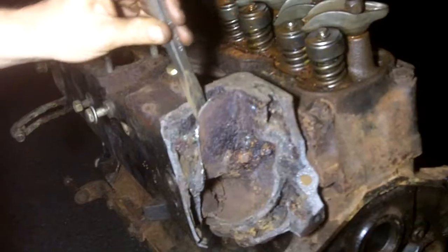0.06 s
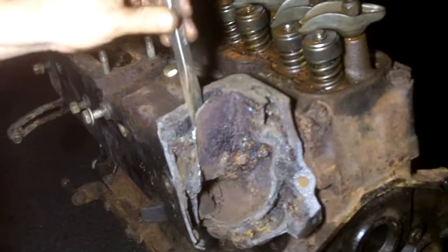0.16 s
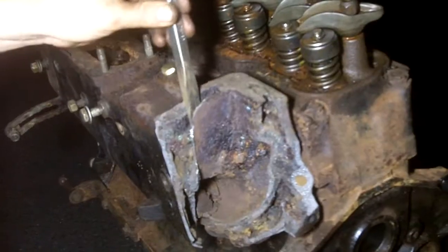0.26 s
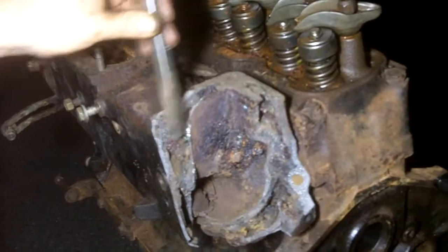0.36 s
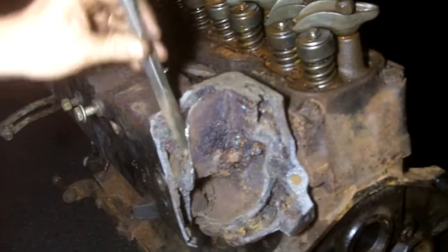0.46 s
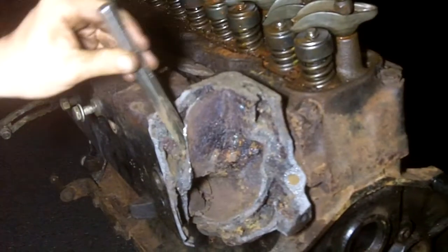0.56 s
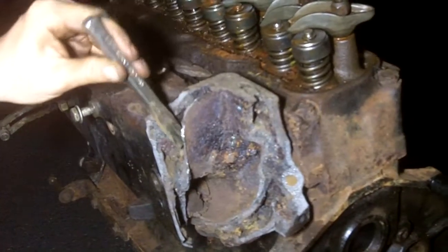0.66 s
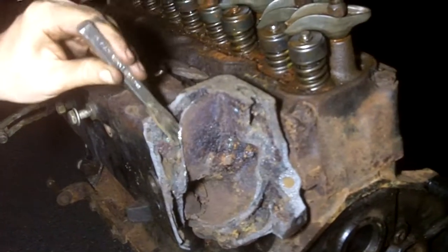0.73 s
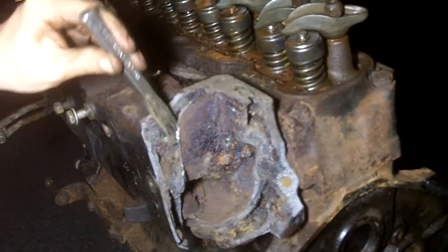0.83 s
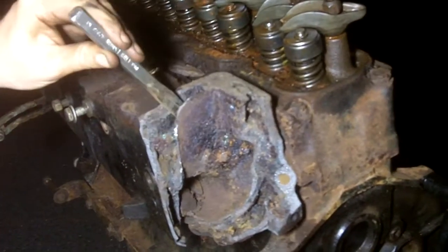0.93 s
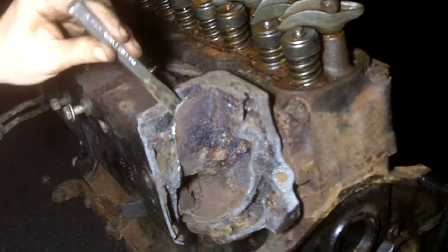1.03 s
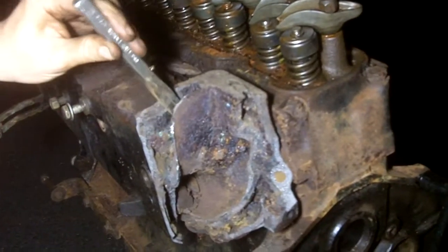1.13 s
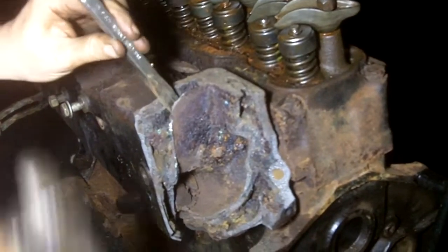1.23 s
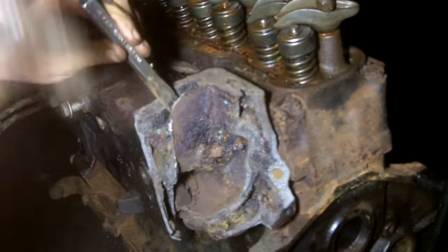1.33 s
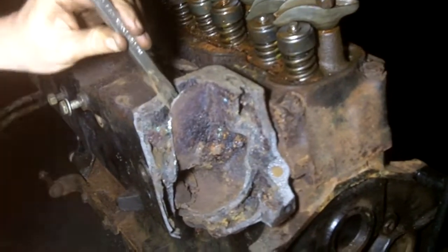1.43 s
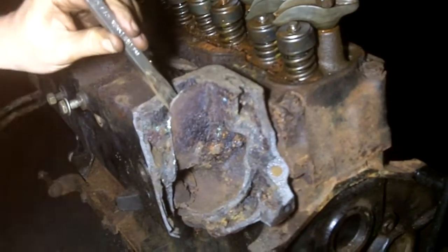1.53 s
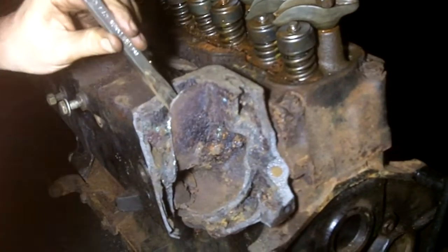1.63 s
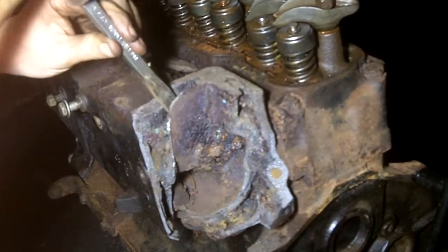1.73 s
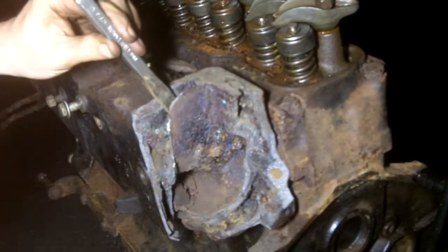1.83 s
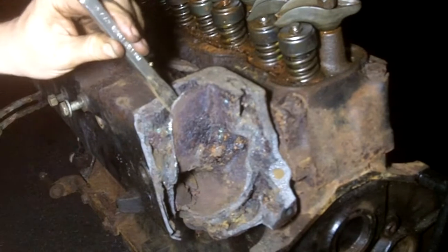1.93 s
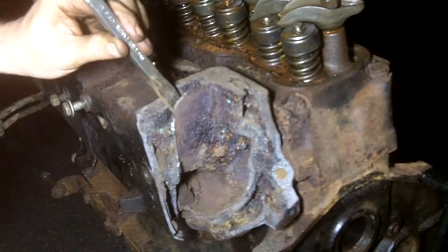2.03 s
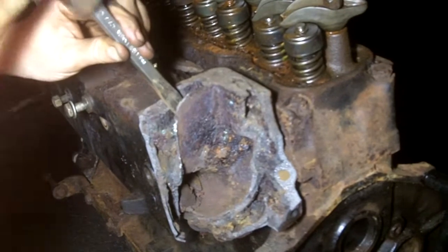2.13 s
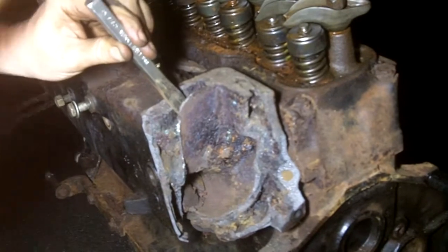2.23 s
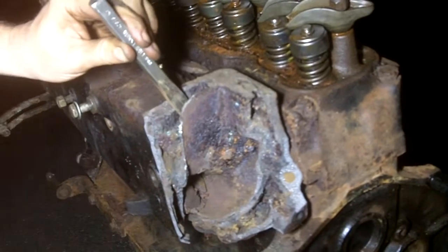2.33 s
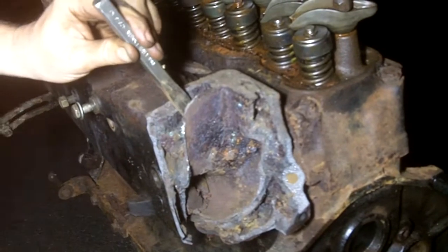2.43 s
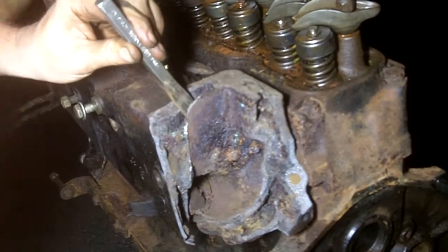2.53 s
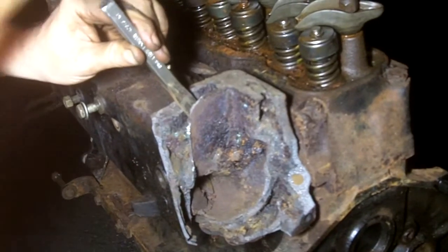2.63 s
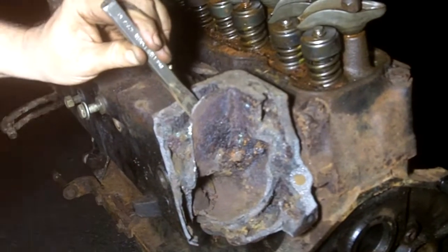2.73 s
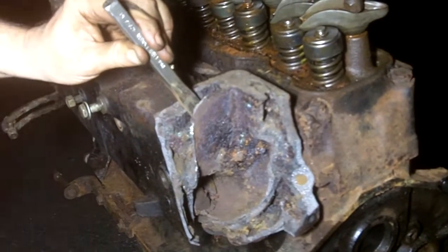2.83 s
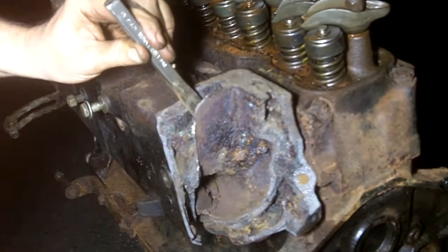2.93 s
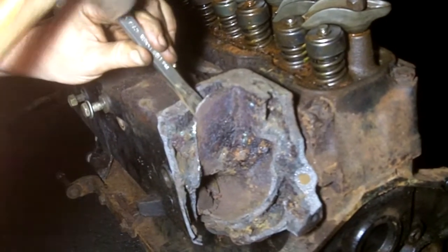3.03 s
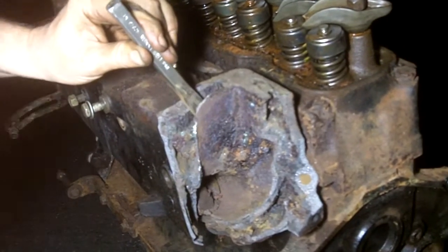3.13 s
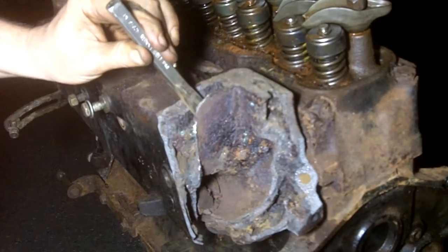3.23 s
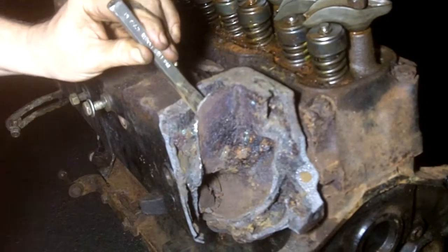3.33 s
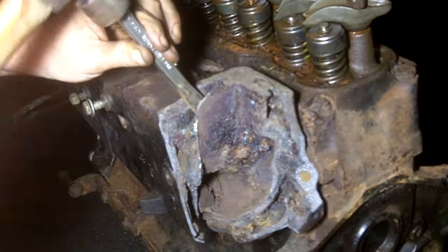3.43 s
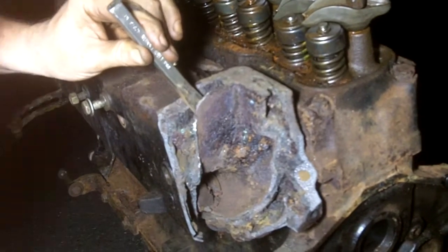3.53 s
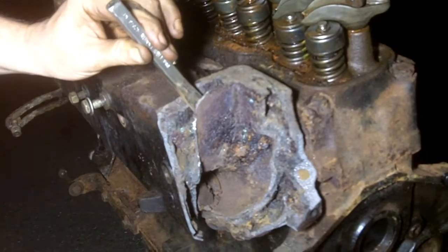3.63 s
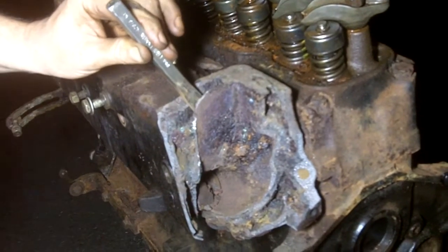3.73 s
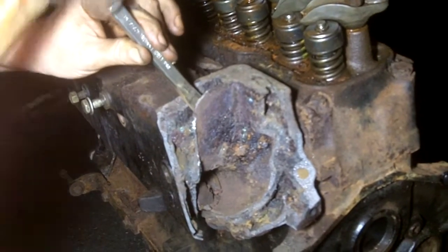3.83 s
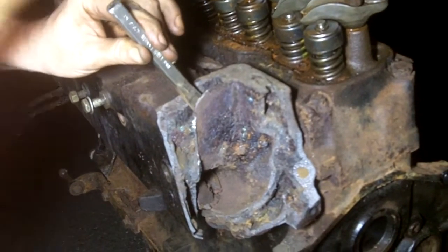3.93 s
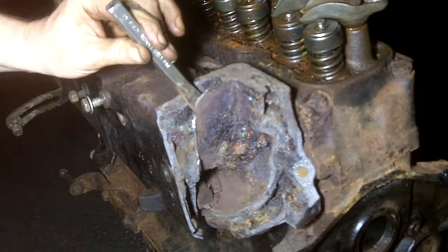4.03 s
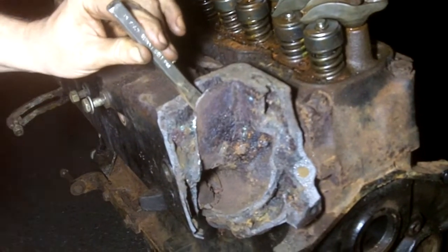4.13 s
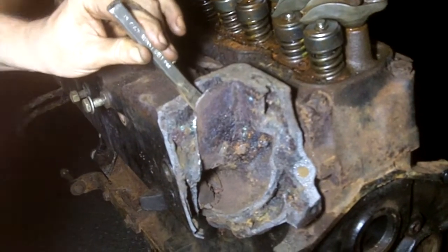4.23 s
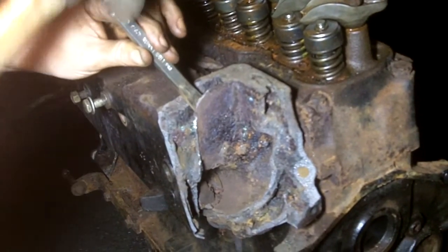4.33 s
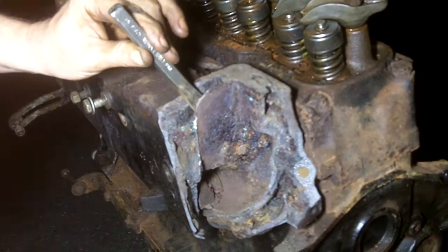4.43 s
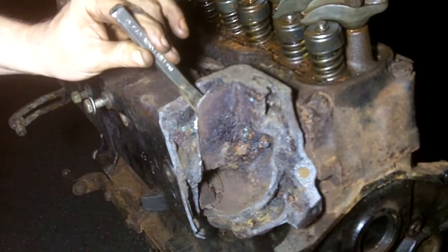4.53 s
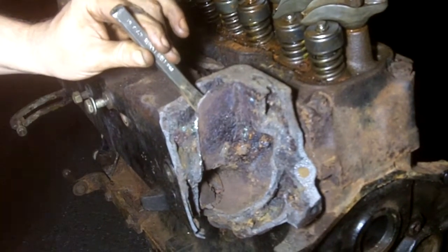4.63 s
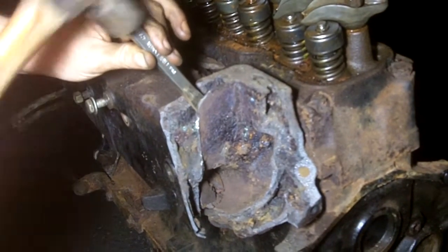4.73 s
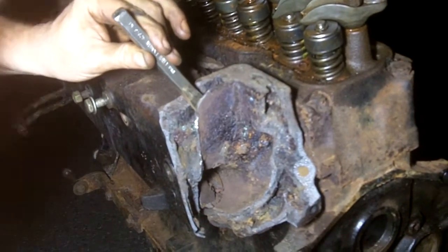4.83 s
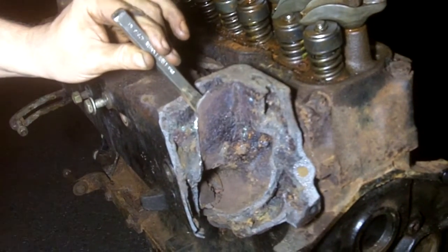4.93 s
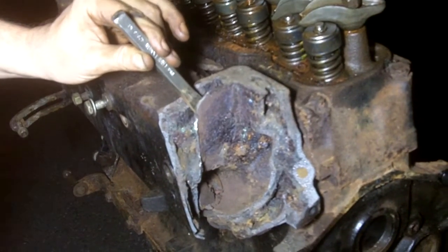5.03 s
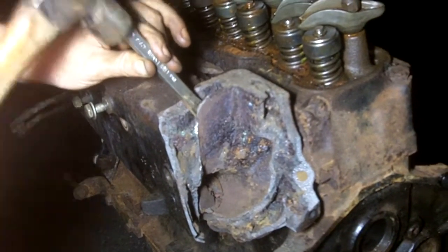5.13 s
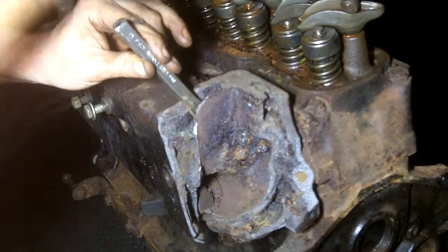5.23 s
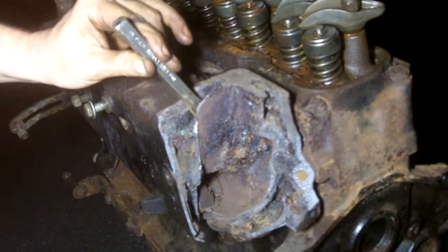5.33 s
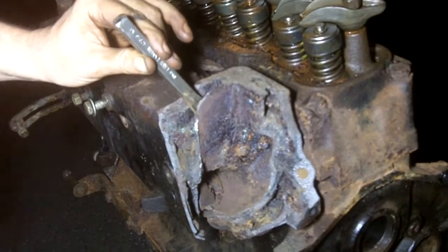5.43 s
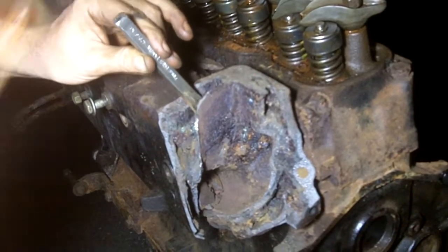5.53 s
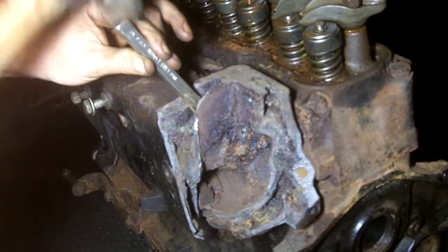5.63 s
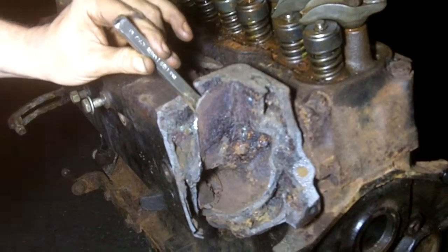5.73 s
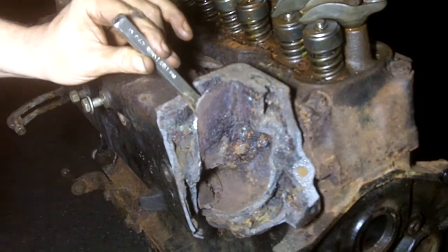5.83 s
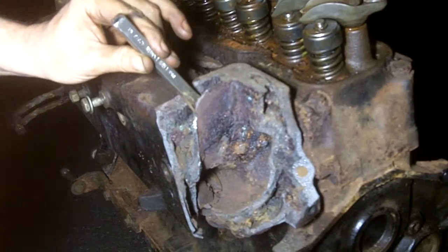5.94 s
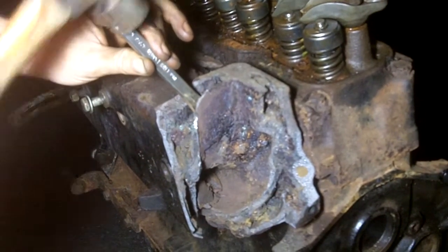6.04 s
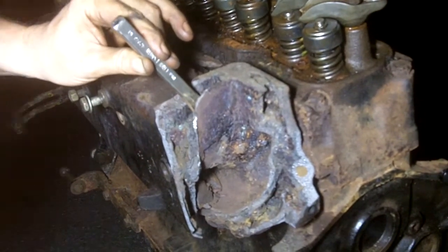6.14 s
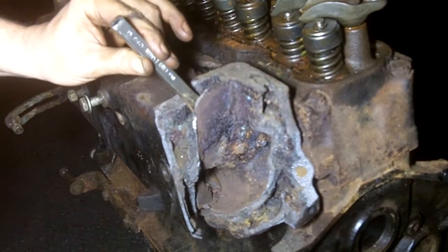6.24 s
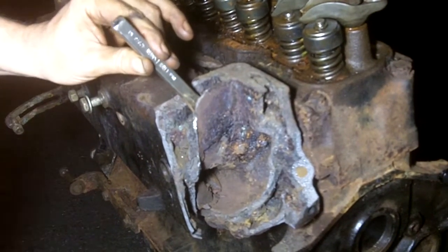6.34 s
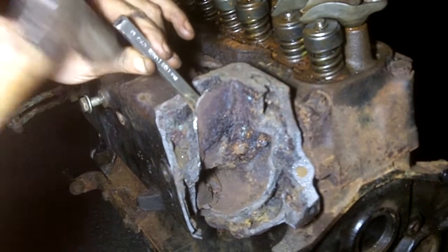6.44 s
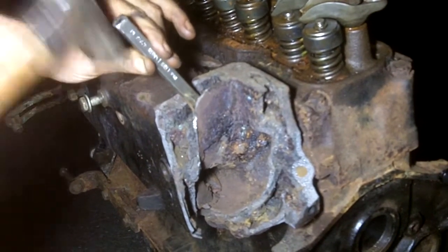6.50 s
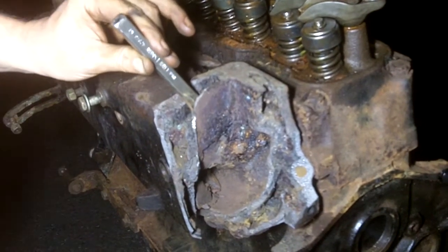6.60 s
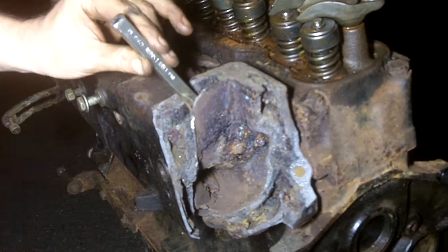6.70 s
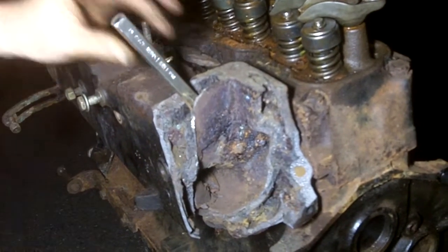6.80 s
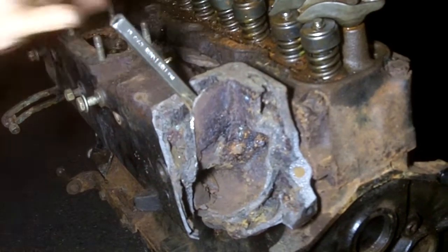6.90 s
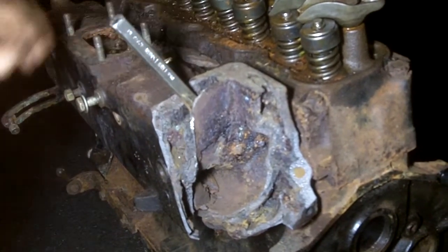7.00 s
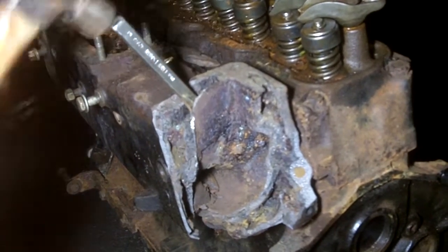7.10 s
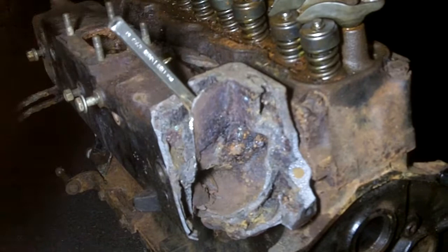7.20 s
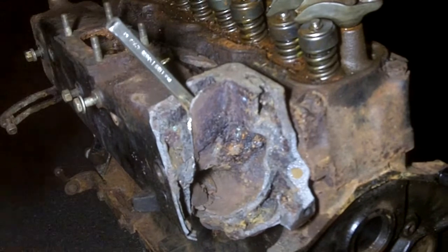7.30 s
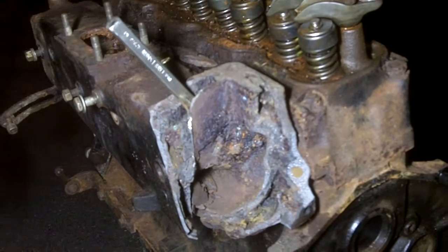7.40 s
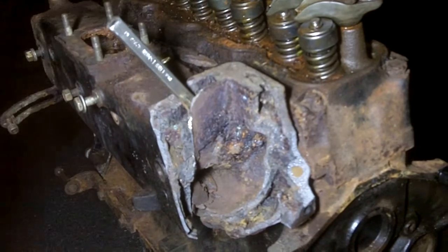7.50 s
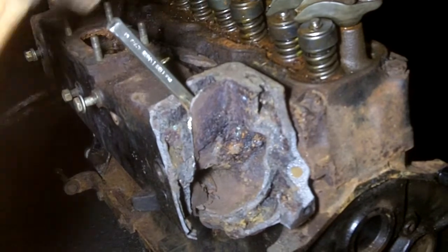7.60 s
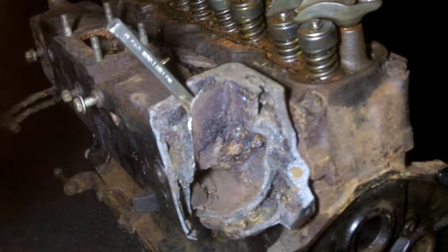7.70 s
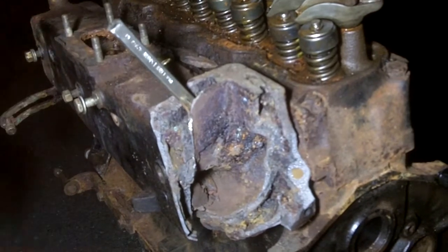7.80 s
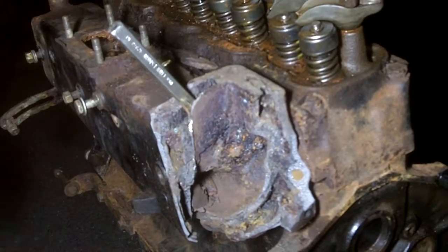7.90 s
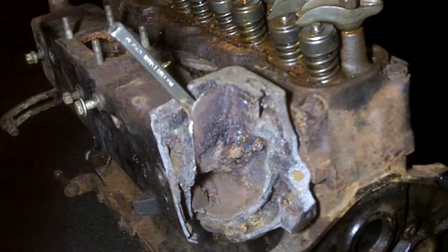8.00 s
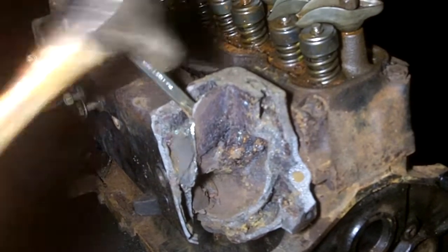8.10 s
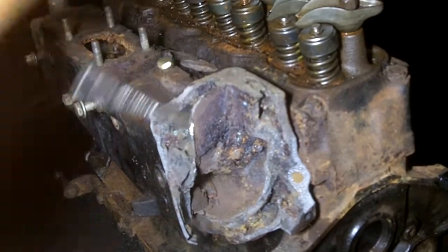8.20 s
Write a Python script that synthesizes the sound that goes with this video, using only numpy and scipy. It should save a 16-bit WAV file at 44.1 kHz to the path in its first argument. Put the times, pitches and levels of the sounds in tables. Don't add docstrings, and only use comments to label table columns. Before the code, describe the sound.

After light ticks, squeaks and scrapes on rust, a hammer strikes a steel chisel fifteen times, ringing hard through a cast-iron block in a garage.

```python
import sys
import numpy as np
from scipy import signal
from scipy.fft import rfft, irfft, next_fast_len
from scipy.io import wavfile
from scipy.ndimage import uniform_filter1d, map_coordinates

SR = 44100
rng = np.random.default_rng(int(sys.argv[2]) if len(sys.argv) > 2 else 0)


def volts(x):
    e = np.asarray(x, float) / 20
    return 10 ** e


def to_wav(s):
    ch = np.atleast_2d(s).T
    pcm = np.round(np.clip(ch, -1, 1) * 32767)
    wavfile.write(sys.argv[1], SR, pcm.astype(np.int16))


N = 364266


def unit(x):
    return x / np.sqrt(np.mean(x ** 2) + 1e-20)


def along(points, hz):
    point_hz, value = np.transpose(points)
    return np.interp(np.log(hz + 1), np.log(point_hz + 1), value)


def wobble(rate_hz, size=N):
    knots = rng.standard_normal(int(size * rate_hz / SR) + 4)
    return map_coordinates(knots, [np.arange(size) * rate_hz / SR])


def noise(gain, size=N):
    m = next_fast_len(size)
    spectrum = rfft(rng.standard_normal(m)) * gain(np.fft.rfftfreq(m, 1 / SR))
    return unit(irfft(spectrum, m)[:size])


def coloured(points_db, size=N):
    return noise(lambda f: volts(along(points_db, f)), size)


def add(track, s, sound):
    part = track[round(s * SR):][:len(sound)]
    part += sound[:len(part)]


def follow_push(usual_db, db_per_db, push_db):
    return usual_db + db_per_db * (push_db + 55)


# frequency in Hz, t60 in seconds.
HEAD_MODES = [(1080, 0.017), (2300, 0.011), (3480, .016), (4600, .014)]
# frequency in Hz, level in dB per Hz.
CRACK_SPECTRUM = [(300, -19.5), (700, -8), (1500, 1), (5000, -2), (9000, -5), (12000, -4), (15200, -8),
                  (15600, -28.5), (16500, -39)]


def strike(modes):
    t = np.arange(int(.06 * SR)) / SR
    ring = 0
    for hz, db, t60_s in modes:
        ring = ring - volts(db - 60 * t / t60_s) * np.sin(2 * np.pi * hz * t + rng.normal(0, 1.0))
    excited = sorted((hz, db) for hz, db, _ in modes) + [(12500, -21)]
    tint = lambda f: volts(along(CRACK_SPECTRUM, f) + along(excited, f))
    crack = noise(tint, size=len(t)) * np.sqrt(np.mean(tint(np.arange(16000)) ** 2))
    contact = volts(-60 * np.maximum(t - .0015, 0) / .009)
    return (volts(5.5) * ring + volts(10.5) * crack * contact) * (1 - np.exp(-t / .0001))


# frequency in Hz, level in dB, t60 in seconds.
IRON_MODES = [(420, 1, .3), (614, -4, .25), (651, 3, .18), (748, -7, .4), (880, -5, .2), (1163, -13, .25),
              (1394, -17, .3)]


def iron_ring():
    t = np.arange(SR) / SR
    ring = 0
    for hz, db, t60_s in IRON_MODES:
        level_db = db + rng.normal(0, 1.6) - 60 * t / min(t60_s, .42) + 4 * wobble(25, size=SR)
        ring = ring + volts(level_db) * np.sin(2 * np.pi * hz * t)
    return ring * (1 - t)


# start in seconds, upper ring of the head in dB, its clank in dB,
# push into the casting in dB, shank ring in Hz.
BLOWS = [(1.7634, -10, -19.5, -57, 6900), (2.2153, -11, -15, -53, 6770), (2.6508, -16, -20, -55, 7200),
         (3.0798, -15.5, -18.5, -55, 6870), (3.4992, -13.5, -22.5, -55, 6640),
         (3.9314, -11, -19.5, -55, 6630), (4.3598, -14, -17, -52, 6920), (4.789, -13.5, -15, -51, 6420),
         (5.2185, -16, -12, -52, 6690), (5.6509, -11, -17.5, -48, 6830), (6.0734, -15, -14, -45.5, 6910),
         (6.5071, -18.5, -22, -47.5, 6800), (7.1604, -18.5, -28, -38.5, 6490),
         (7.666, -21.5, -14.5, -40.5, 6630), (8.1481, -22, -11.5, -44, 6730)]
ZERO_SHIFT = [.001, .035, .3, .105, .037, .037, -.008, .009, .012, .047, .11, .013, .017, .024, .29]


def blows():
    out, t = np.zeros(N), np.arange(int(.06 * SR)) / SR
    thump = (t / 0.00024 - 1) * np.exp(-t / 0.00041) * (1 - np.exp(-t / 0.000079))
    for (s, upper_db, clank_db, push_db, shank_hz), shift in zip(BLOWS, ZERO_SHIFT):
        loose_db = 22 * np.exp((BLOWS[0][0] - s) / 1.6)
        usual_db = np.array([-20.5 - .7 * (clank_db + 17.5) + .3 * loose_db, -14.5, -16, -21])
        top_db, shank_db, second_db, third_db = usual_db + 1.6 * rng.standard_normal(4)
        second_hz = 7800 + 250 * rng.standard_normal()
        flange_db = follow_push(-41, 1.9, push_db) + loose_db
        head_db = [flange_db, clank_db, upper_db, top_db]
        modes = [(hz, db, t60_s) for (hz, t60_s), db in zip(HEAD_MODES, head_db)]
        modes += [(shank_hz, shank_db, .016), (second_hz, second_db, .018)]
        modes += [(10400, third_db, .014), (1680, -22.5, .014)]
        blow = strike(modes)
        spill = volts(-5) * blow + volts(13) * (t == 0)
        room_db = np.clip(follow_push(-4, 1.4, push_db), -3.5, .8)
        thump_db = follow_push(-27, .35, push_db) + 40 * shift
        add(out, s + .0008, garage(blow, room_db - 36.5, room_db - 59, spill))
        add(out, s + 0.0009, volts(thump_db + 14.5) * thump)
        add(out, s, volts(follow_push(-55.5, 1.6, push_db)) * iron_ring())
    return out


def casting():
    t = np.arange(N) / SR
    times, _, _, push_db, _ = np.transpose(BLOWS)
    last = np.clip(np.searchsorted(times, t) - 1, 0, None)
    level = volts(push_db[last] + 1.5 - 60 * (t - times[last]) / 3.8) * (t > times[0])
    return uniform_filter1d(level, size=200) * volts(.3 * wobble(12)) * np.sin(2 * np.pi * 361.5 * t)


# frequency in Hz, level in dB per Hz.
DENSE_SPECTRUM = [(250, -120), (400, -25), (550, -2), (780, 0), (1100, -7), (1600, -18), (2500, -40),
                  (4000, -120)]


def murmur():
    out, t = np.zeros(N), np.arange(SR) / SR
    for s, _, _, push_db, _ in BLOWS:
        rush = coloured(DENSE_SPECTRUM, size=SR) * (1 - np.exp(-t / .01))
        level_db = follow_push(-55.5, 1.6, push_db) - 12.5
        add(out, s, volts(level_db - 60 * t / .85) * rush)
    return out


# frequency in Hz, level in dB per Hz.
RUST_SPECTRUM = [(350, -38.5), (600, -5.5), (1070, 6), (1330, -1), (2500, -9), (2750, -3), (3190, -5),
                 (4970, -6), (5540, -17), (6000, -4), (6780, -2.5), (11300, -22.5), (15000, -44.5)]
# start in seconds, peak in dB, resonance in Hz, t60 in seconds.
TICKS = [(.155, -40, 4500, .015), (.2227, -35.5, 3660, .047), (.2386, -30.5, 4320, .014),
         (.2694, -44.5, 3550, .056), (.403, -43, 2750, .027), (.4346, -33, 4200, .01),
         (.5302, -33.5, 7980, .018), (.536, -34, 2840, .018), (.5623, -32.5, 2780, .066),
         (.6024, -26.5, 3540, .01), (.619, -12, 5000, .012), (.635, -39, 7530, .3),
         (.827, -33.5, 2770, .019), (.8324, -26, 2840, .062), (.894, -47.5, 2680, .038),
         (.914, -34, 4200, .09), (.9294, -36, 3200, .038), (.9463, -31, 2020, .052),
         (.9672, -26.5, 2740, .03), (.9875, -23, 2690, .043), (.9992, -16, 3500, .021),
         (1.1186, -43.5, 3340, .074), (1.1568, -31.5, 4250, .013), (1.2126, -35.5, 3370, .046),
         (1.4067, -48, 3340, .033), (1.557, -42, 7300, .033), (1.652, -49, 4380, .032),
         (1.667, -37, 7000, .015),
         (2.13, -52.5, 2410, .015), (2.1674, -39.5, 2080, .04), (2.174, -37.5, 2270, .01),
           (2.444, -47.5, 1620, .042), (2.4984, -51.5, 2245, .051), (2.5057, -50.5, 2190, .03),
           (2.55, -35.5, 2420, .025), (2.5662, -48, 2530, .045), (2.583, -43, 1910, .022),
           (3.9594, -27.5, 2280, .039), (4.3794, -39.5, 6980, .017), (4.3859, -30.5, 4530, .049),
           (4.3994, -30.5, 2150, .029), (6.627, -33.5, 3210, .043), (7.0915, -36, 1550, .016),
           (7.2059, -27, 2900, .028), (7.4549, -55, 1980, .025), (7.4906, -47, 2780, .033),
           (7.5104, -41.5, 2910, .027), (7.5778, -55, 1520, .016), (8.057, -57, 1600, .02),
           (8.103, -54, 2000, .02), (8.122, -57, 2000, .02)]


def ticks():
    out, t = np.zeros(N), np.arange(int(.2 * SR)) / SR
    for s, db, hz, t60_s in TICKS:
        octaves = np.log2(hz / 2000)
        knock_db = min(-19 + 250 * t60_s, -3) - 7 * octaves
        bright_db = -25 + 11 * octaves
        tone = [(1300, knock_db + 6.5), (1800, 0), (5000, 0.0024), (6000, bright_db + 8.5)]
        resonance = lambda f: 1 + 1.3 / (1 + ((f - hz) / 250) ** 2)
        colour = lambda f: volts(along(RUST_SPECTRUM, f) + along(tone, f)) * resonance(f)
        add(out, s, volts(db - 5 - 60 * t / abs(t60_s)) * noise(colour, size=len(t)))
    return out


# start in seconds, frequency in Hz, level in dB, t60 in seconds.
SQUEAKS = [(.402, 2750, -53, 0.11), (.535, 2704, -30, 0.095), (.537, 1094, -46, 0.31),
           (.568, 2850, -44, 0.22), (.568, 11100, -48.5, 0.12), (.601, 3450, -43, .05),
           (.601, 6500, -46, .04), (.649, 7560, -48, 0.14), (.65, 11300, -57, 0.19),
           (0.834, 2770, -31, 0.041), (.833, 1095, -36, 0.057), (.833, 7440, -38, 0.051),
           (.968, 2710, -32.5, 0.051), (0.985, 2725, -26, 0.046), (0.988, 6200, -29.5, 0.042),
           (.999, 3490, -22, 0.026), (.834, 1800, -40, .07), (6.52, 10300, -48, .35),
           (6.627, 1290, -40, .04)]


def squeaks():
    out, t = np.zeros(N), np.arange(int(.2 * SR)) / SR
    for s, hz, db, t60_s in SQUEAKS:
        level = volts(db - 60 * t / t60_s + 2.5 * wobble(88, size=len(t)))
        add(out, s, level * (1 - np.exp(-t / .001)) * np.sin(2 * np.pi * hz * t))
    return out


# peak time in seconds, level in dB, seconds to swell 20 dB,
# seconds to fall 20 dB.
STROKES = [
    (.244, -45, .063, .033),
    (.618, -46.5, .12, .14),
    (.838, -44, .035, .05),
    (1.006, -42, .22, .008),
    (1.22, -54, .06, .023),
    (1.4, -71, .9, .9),
    (1.556, -55, .04, .054),
    (1.67, -54.5, .033, .006),
]


def scrapes():
    t = np.arange(N) / SR
    grains = unit(volts(4.5 * wobble(220) + 3.5 * wobble(40)) * coloured(RUST_SPECTRUM))
    drag = 0
    for s, db, swell_s, fall_s in STROKES:
        drag = drag + volts(db - 20 * np.maximum((s - t) / swell_s, (t - s) / fall_s))
    return (t < BLOWS[0][0]) * drag * grains


def chisel():
    return garage(ticks() + squeaks() + scrapes(), -44, -53.5)[:N]


# frequency in Hz, level in dB per Hz.
WALL_SPECTRUM = [(300, 3.5), (1000, 9), (3000, 1.5), (4600, 2.5), (6200, 0.5), (7800, 4), (8700, -2.5),
                 (11500, -9), (13000, -27.5), (15000, -44)]
# frequency in Hz, t60 in seconds.
GARAGE_T60 = [(500, 0.4), (2000, .54), (7500, 0.74), (9500, .86), (12000, 0.88)]


def garage(x, near_db, far_db, away=None):
    t = np.arange(int(.8 * SR)) / SR
    soft = lambda f: volts(along(WALL_SPECTRUM, f)) / (1 + (f / 12800) ** 16)
    hz, frame_s, z = signal.stft(noise(soft, size=len(t)), SR, nperseg=256)
    near = volts(near_db - 60 * frame_s / 0.062)
    far = volts(far_db - 60 * frame_s / along(GARAGE_T60, hz)[:, None])
    answer = signal.istft(z * (near + far), SR, nperseg=256)[1][:len(t)]
    answer = answer * (1 - np.exp(-(t / 0.0013) ** 2)) * (1 - t / t[-1])
    return np.pad(x, (0, len(t) - 1)) + signal.fftconvolve(x if away is None else away, answer)


# time in seconds, hum in dB.
STIR = [(.26, -46.5), (.95, -57), (1.4, -43), (1.6, -43), (1.76, -52), (1.91, -58), (2.06, -50.5),
        (2.26, -70), (2.51, -55), (2.86, -64), (4.54, -63), (4.78, -52), (4.98, -61), (6.6, -58),
        (7.05, -46), (7.3, -52), (7.9, -59), (8.26, -47)]
# frequency in Hz, level in dB per Hz.
RUMBLE_SPECTRUM = [(12, -30), (20, -2.5), (27, -7.5), (48, -8.5), (86, -14.5), (172, -12), (300, -22.5),
                   (390, -44), (660, -120)]
# frequency in Hz, level in dB per Hz.
HUM_SPECTRUM = [(150, -41), (250, -12), (296, -14), (367, 2.5), (400, -7), (449, -12.5), (573, -22),
                (740, -19.5), (816, -35), (1000, -31.5), (1300, -65.5), (2200, -120)]
# frequency in Hz, level in dB per Hz.
HISS_SPECTRUM = [(470, -29), (800, 1), (1140, -9), (1690, -9.5), (2010, -6), (2660, -22.5), (2970, -9),
                 (3530, -19.5), (4400, -1.5), (5420, -46), (5980, -31), (12000, -26), (15000, -30.5)]


def air():
    t, times = np.arange(N) / SR, np.transpose(BLOWS)[0]
    until_s = times[np.clip(np.searchsorted(times, t), 0, len(times) - 1)] - t
    ducked = np.clip((t - times[0]) / .12, 0, 1)
    stir_s, stir_points_db = np.transpose(STIR)
    stir_db = np.interp(t, stir_s, stir_points_db)
    hum_db = stir_db + 7 * np.exp(-np.abs(until_s) / .06)

    rumble_db = -49 + .55 * (stir_db + 55) - 12 * ducked
    rumble = volts(rumble_db + 3.0 + 1.5 * wobble(9)) * coloured(RUMBLE_SPECTRUM)
    shake = volts(-46) * noise(lambda f: (f > 15) / (1 + (f / 40) ** 4))
    rumble = rumble + (t < times[0]) * shake

    hum = volts(hum_db + 3.0 + 0.5 * wobble(2.9)) * coloured(HUM_SPECTRUM)
    flat = volts(hum_db - 4.8) * noise(lambda f: volts(np.minimum(along(HUM_SPECTRUM, f), -8)))
    hum = np.where(t < times[2], hum, flat)

    hiss_db = -65.5 - 13 * ducked
    hiss = volts(hiss_db + 3 + 1.6 * wobble(5)) * coloured(HISS_SPECTRUM)
    return rumble + hum + hiss


def scene():
    faint_top = signal.ellip(8, .1, 50, 14600, fs=SR, output="sos")
    faint = signal.sosfilt(faint_top, chisel() + air())
    return np.tile(blows() + casting() + murmur() + faint, (2, 1))


def rest_level():
    out, t = np.full(N, .0185), np.arange(N) / SR
    drain = .4 * np.exp(-t / .02) + .88 * np.exp(-t / .085) - .13 * np.exp(-t / .8)
    for (s, *_), shift in zip(BLOWS, ZERO_SHIFT):
        add(out, s + .0008, shift * (1 - np.exp(-t / .001)) * drain)
    return out


def roll_off(x):
    return signal.sosfilt(signal.butter(12, 16550, fs=SR, output="sos"), x)


def record(dry):
    opposite = np.array([[1], [-1]])
    x = signal.lfilter(*signal.iirnotch(5480, 8, fs=SR), dry) + rest_level()
    x = x / (1 + np.abs(x) ** 8) ** (1 / 8)
    loudness = uniform_filter1d(np.abs(dry[0]), size=64)
    x = x + volts(-41.5) * loudness * noise(lambda f: 1 + 700 / (f + 150)) * opposite
    x = x + (.0015 + volts(-66.5) * noise(lambda f: 1 / (1 + (f / 60) ** 2))) * opposite
    x = signal.sosfilt(signal.ellip(8, .1, 70, 16300, fs=SR, output="sos"), x)
    start_s, rise_s = .1535, .0004
    mix = x * np.clip((np.arange(N) / SR - start_s) / rise_s, 0, 1)
    return roll_off(mix)


dry = scene()
out = record(dry)
to_wav(out)
```